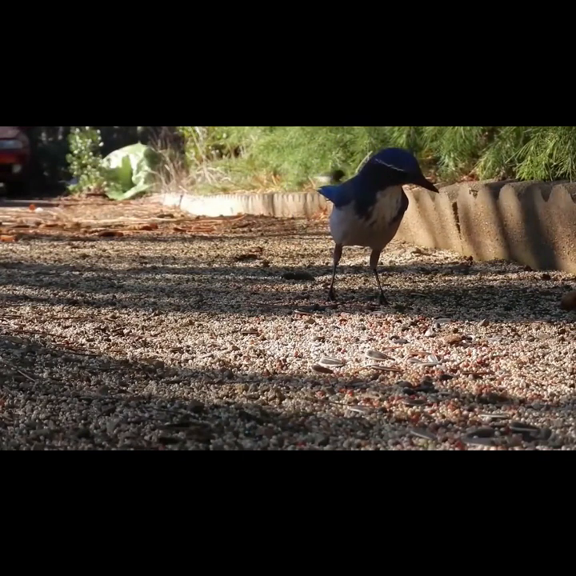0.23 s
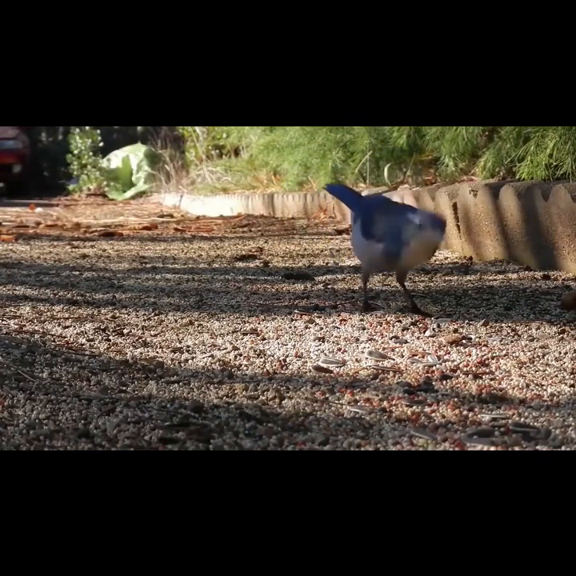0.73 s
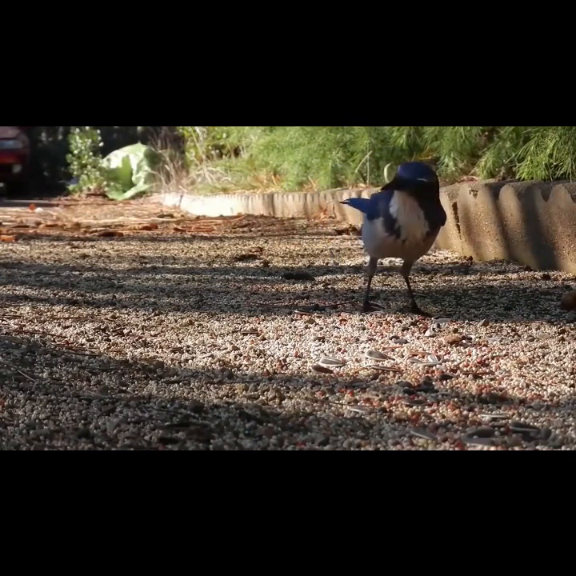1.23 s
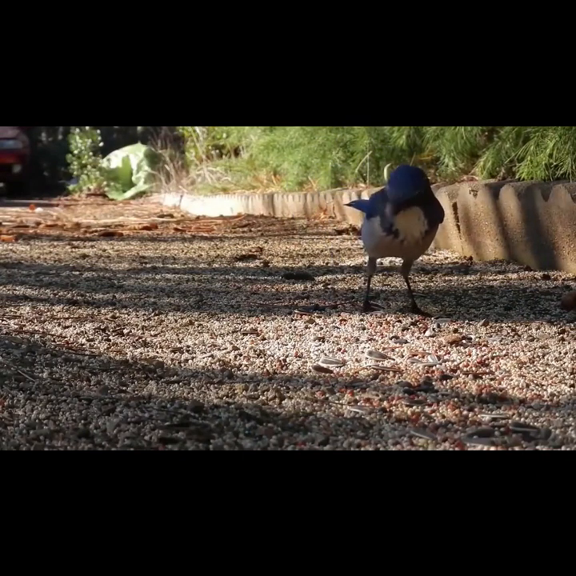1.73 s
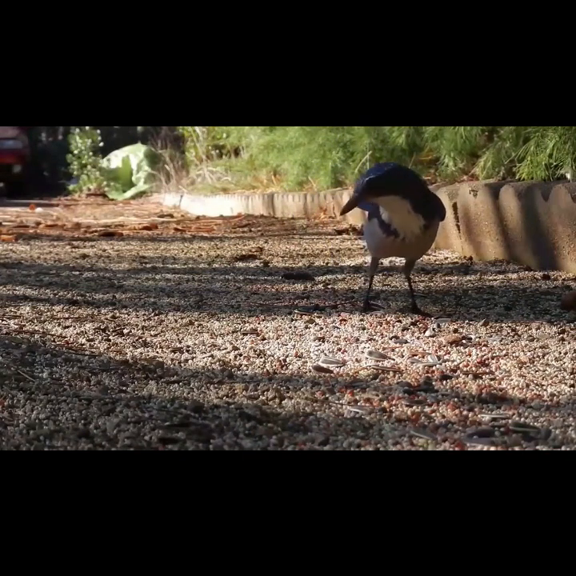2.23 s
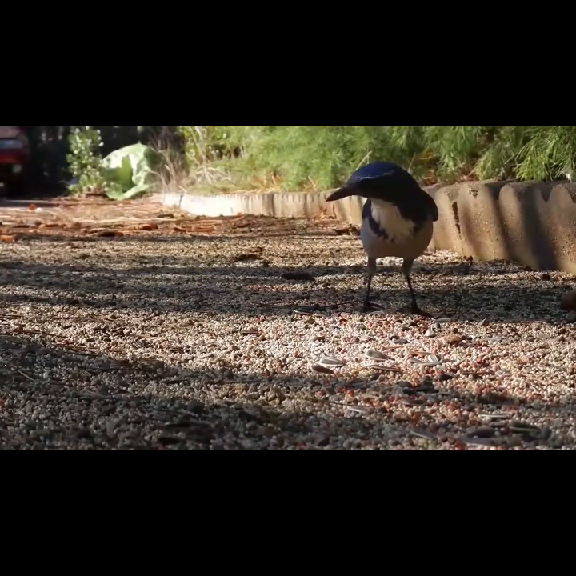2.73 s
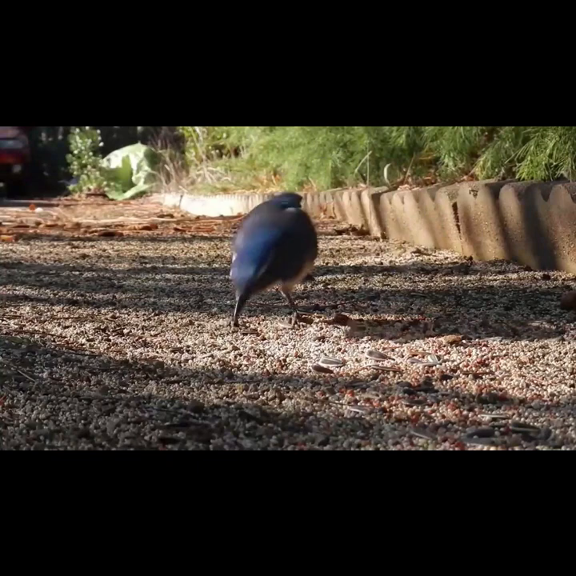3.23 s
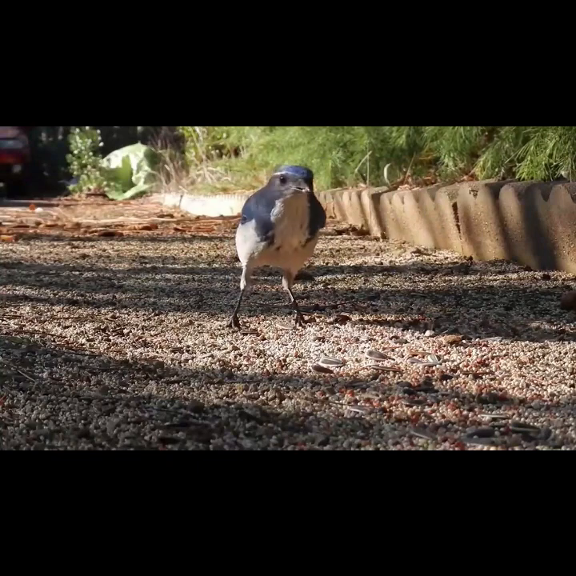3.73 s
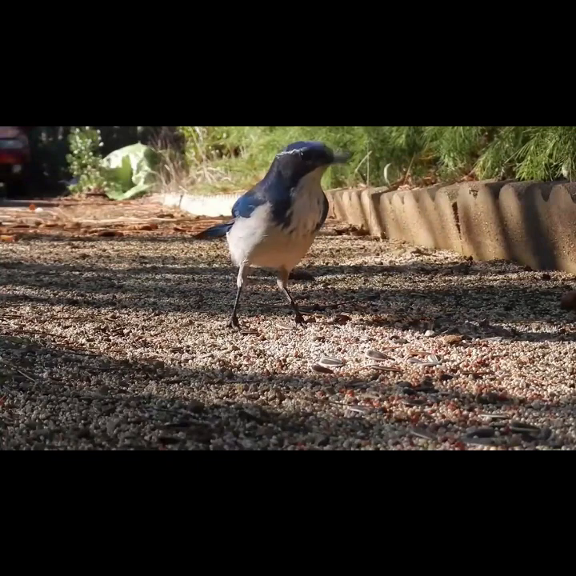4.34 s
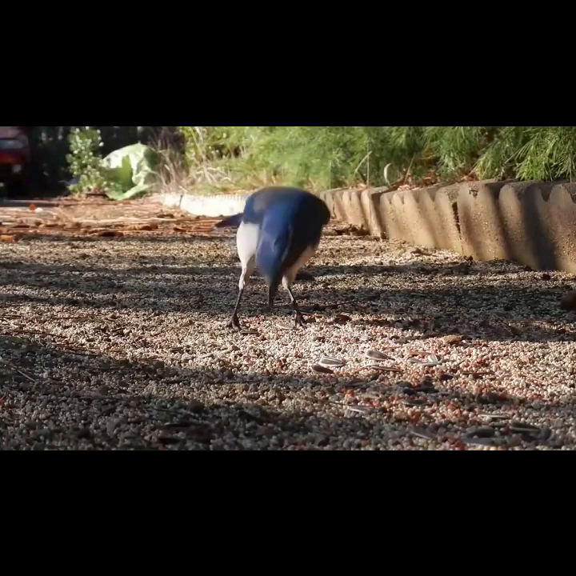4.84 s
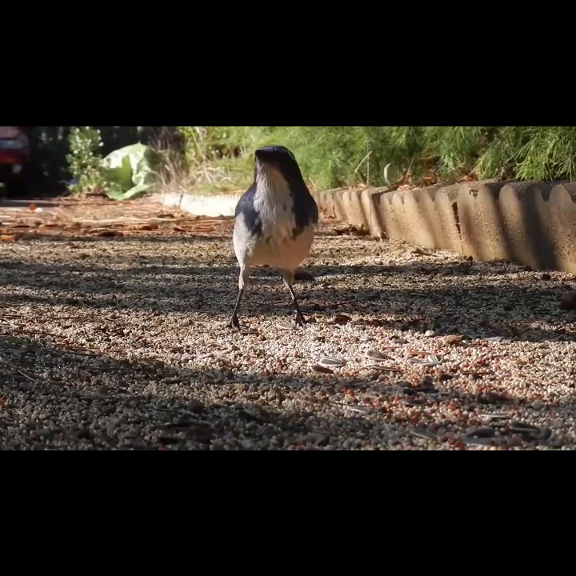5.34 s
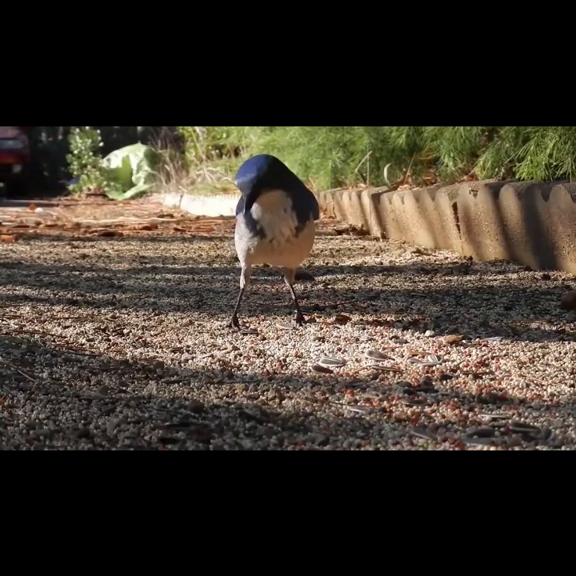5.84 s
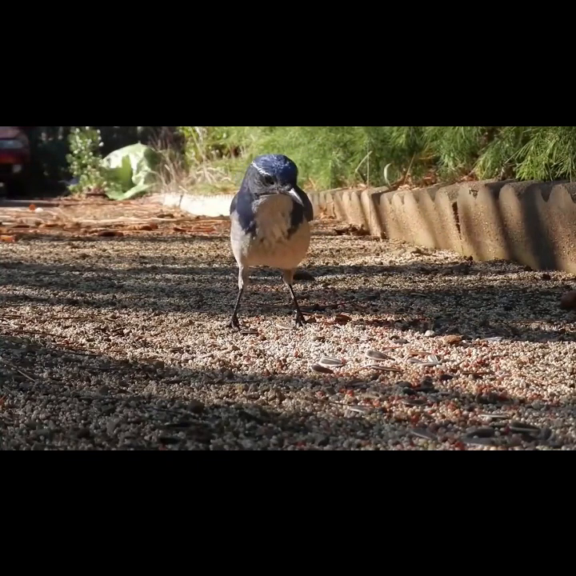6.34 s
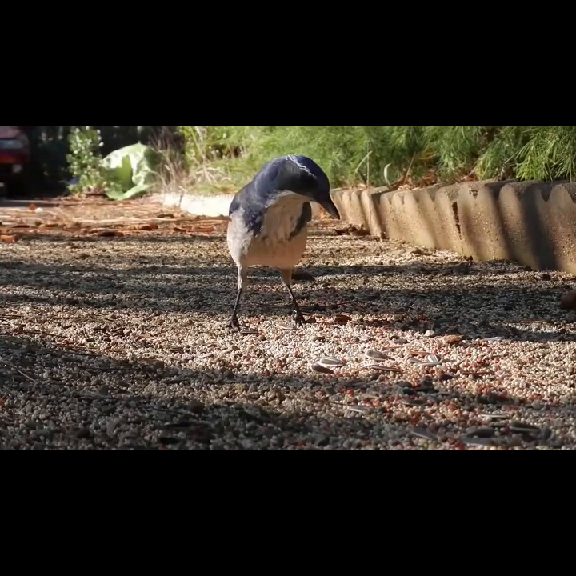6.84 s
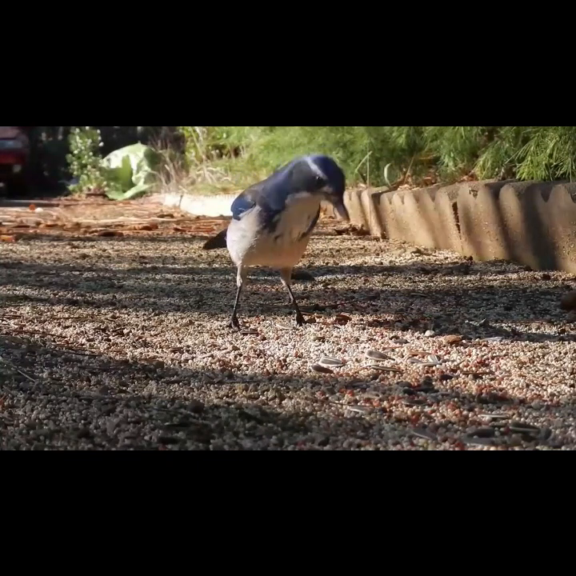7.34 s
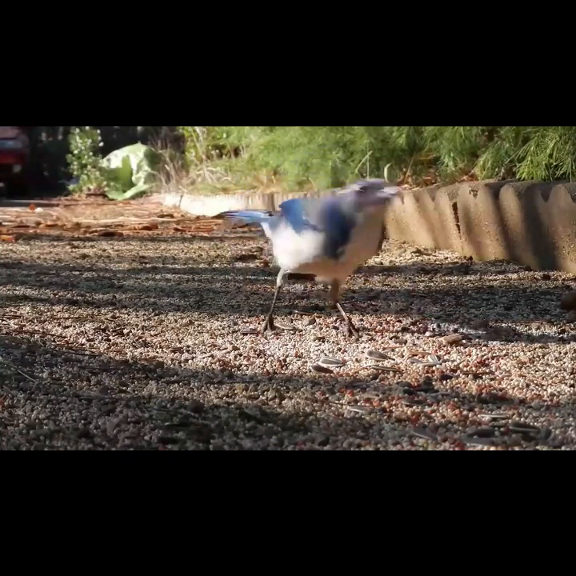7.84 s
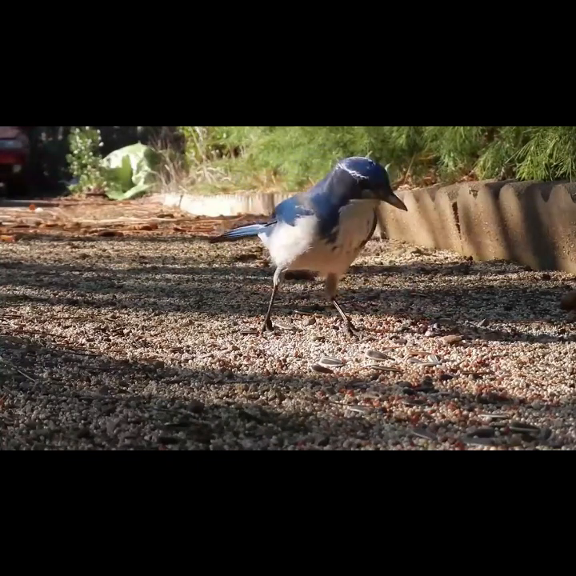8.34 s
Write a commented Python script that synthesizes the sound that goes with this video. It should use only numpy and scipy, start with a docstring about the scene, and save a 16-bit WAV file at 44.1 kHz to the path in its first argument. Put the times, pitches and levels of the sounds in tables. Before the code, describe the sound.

A jay on a gravel path gives short harsh rasping calls in bursts, with softer chirps, rustling gravel, clicks and faint camera ticking between.

```python
"""Jay calls on a gravel path

A jay gives harsh calls close to a camera: two whistled voices beat, part and break into a noisy rasp.
A second bird chirps arched notes made of smooth sine tones; a small far one twitters in thin, breathy whistles.
Noise grains rustle like feathers and gravel, grit clicks, and the focus motor ticks with short ringing tones.
Shaped noise makes the quiet garden air. The recorder cuts the bass and clips peaks that are too loud."""
import sys
import numpy as np
from scipy import signal
from scipy.fft import rfft, irfft, next_fast_len
from scipy.io import wavfile
from scipy.ndimage import uniform_filter1d

SR = 44100
rng = np.random.default_rng(int(sys.argv[2]) if len(sys.argv) > 2 else 0)


def generate_wav(sig):
    """Save sig (samples, or channels by samples) to the path in sys.argv[1] as 16-bit PCM at SR."""
    pcm = np.round(np.clip(np.atleast_2d(sig).T, -1, 1) * 32767).astype(np.int16)
    wavfile.write(sys.argv[1], SR, pcm)


N = 378819  # length in samples

# All levels are settings ahead of each source's own trims, the garden and the recorder.
# The jay's short calls, timed from the catch, where the pitch dips and the voices part:
# (catch [s], rise [s], parting [s], whistle [dB], lower voice [dB], lead-in [dB], parted upper voice [dB],
#  parted lower voice [dB], streak [dB], rebound [dB], pitch [Hz], first beat [Hz], last beat [Hz],
#  upper top [Hz], rasp length [s], rasp [dB], fade [dB], low throat [dB], middle throat [dB], top [dB],
#  beak resonance [Hz])
SHORT_CALLS = [(.02, .043, 0.032, -18.5, -0.5, .1, -10.5, -11, -24.5, -38, 2800, 248, 295, 3560, 0.082, -17.5, 0, -12.5, -2, -11, 6720),
               (.32, 0.048, 0.051, -16, -7, -3.5, -8.5, -9, -28, -42, 2760, 260, 232, 3640, 0.09, -17, -0.5, -11.5, 1.1, -7, 6950),
               (.614, 0.046, 0.038, -16, -5.5, -4, -2, -4, -24, -43, 2760, 175.6, 230, 3707, .076, -16, -3.5, -14.5, -0.5, -7.5, 6920),
               (3.126, .043, .04, -7.5, -2, 4, -0.5, 3.5, -38, -12, 2840, 150.1, 90.8, 3617, .1, -18, 1.5, 1.2, -1.7, -0.2, 7340),
               (3.39, 0.042, 0.042, -8, 2, 4.5, -2.5, 3.5, -30, -26, 2860, 120.5, 139, 3623, 0.091, -18.5, 0, -2, -0.5, 2, 6560),
               (5.326, 0.042, 0.046, -8, -2, -7, 1, 2, -31, -28, 2808, 128.8, 191.7, 3643, 0.1, -20.5, -3.5, 1.5, 3.5, -3, 6970),
               (5.594, 0.048, 0.04, -9, 3.5, -1.5, -1.5, -2.5, -31, -26, 2867, 249.3, 311.7, 3707, 0.09, -19, -1.8, -2, 0.5, 1.4, 6870),
               (5.869, 0.045, .045, -7.5, 1.4, -4, -3, -3.5, -34, -30, 2706, 171.5, 347, 3440, 0.086, -24.5, -0.5, -1, 1.5, 2, 7100),
               (6.15, .036, 0.04, -8, 2, 1, 1, -0.3, -28, -30, 2872, 131, 290.3, 3530, 0.092, -20.5, 0.4, 1, 1, 1.5, 7040),
               (6.535, 0.041, 0.044, -7.5, -1, -3, 0.6, 0.3, -31, -28, 2798, 119.7, 99.7, 3530, 0.097, -22.5, 2.5, 0.5, 0, -5, 6900),
               (6.815, .043, 0.045, -8.5, 2, 0.5, 2, -4.5, -32, -27, 2765, 400.6, 212.7, 3570, .1, -21.5, -6, 0, 2, -2.5, 6760)]
# Whistle of a short call; place counts in rises before the catch, in partings after it:
# (place [-], lower voice share of pitch [-], lower voice level [dB], climb of upper voice [0-1],
#  upper voice level [dB])
SHORT_WHISTLE = [(-2.05, .52, -46, .05, -43), (-1.57, .62, -27, .2, -23.5), (-1.2, .8, -23, .3, -23.5),
                 (-1.02, .88, -9.5, .02, -3.5), (-.52, 0.96, -4, .02, -3), (-.2, 0.98, -3, .02, -1),
                 (-.1, .97, -8, 0, -5.5), (.001, .93, 3.5, .02, -9), (.12, .94, -11, .1, -2),
                 (.24, .955, -14, .35, 3), (.38, .95, -9.5, .7, -14), (.53, .94, -9, 1, -5.5),
                 (.75, .83, -13, 0.9, -21.5), (1.02, .69, -12, 1, -15), (1.35, 0.496, -15.5, .8, -42)]
# Three fainter strands of a short call: one climbs from below into the catch, one falls from above after it,
# one arches up from the lowest point: (place [-], share of pitch [-], level [dB], overtone level [dB])
UNDER_STRAND = [(-0.8, 0.59, -21.5, -19.5), (-.3, .55, -20, -11), (-0.3, .75, -13.5, -20),
                (0.2, 0.84, -22, -18)]
STREAK_STRAND = [(-.1, 1.9, -3, -28), (.35, 1.9, -3.3, -26), (.8, 1.7, 3, -27), (1.15, 1.2, 4, -29)]
REBOUND_STRAND = [(.98, 0.74, -4.5, -25), (1.35, 1, .1, -25), (1.55, .9, -4.5, -26), (1.85, .68, -7, -25)]
# The jay's long calls: (catch [s], whistle [dB], pitch factor [-], rise [s], rasp length [s], rasp [dB],
#  fade [dB], low throat [dB], middle throat [dB], top [dB], beak resonance [Hz])
LONG_CALLS = [(8.372, -0.06, .999, .06, .078, -22.5, 1.5, 4, 1.5, 4, 7030),
              (8.628, -0.4, 1.01, 0.061, .078, -18.5, .1, 0.5, 3, 5, 7060)]
# Whistle of a long call, which climbs further and tumbles twice:
# (time from the catch [s], lower voice [Hz], its level [dB], upper voice [Hz], its level [dB])
LONG_CALL_WHISTLE = [(-.097, 1602, -54, 1900, -39), (-.078, 1848, -17.5, 2700, -24.5),
                     (-.068, 2335, -20, 2450, -13), (-.058, 2606, -12, 2740, -5),
                     (-.039, 2976, -9, 3388, -16), (-.024, 3040, -13, 3300, -25),
                     (-.008, 3000, -29, 3384, -11.5), (.001, 2875, -6, 3420, -13),
                     (0.013, 2825, -10.5, 3740, -9), (.026, 2249, -15, 2800, -9.5),
                     (.036, 1885, -18, 3290, -12), (.046, 1860, -25, 2950, -8.5),
                     (.058, 1780, -20, 2050, -23)]
# Rasp of every call; place counts in rises before the catch, in rasp lengths after it:
# (place [-], effort [dB], low throat [dB], middle throat [dB], top [dB], share of beak resonance [-])
RASP_SHAPE = [(-2, -36.5, 4.5, 8, -4, 0.94), (-1.3073, -16.5, 7, 1, -2, 1),
              (-0.61, 1.27, -6.5, -6.5, -2, 1), (0.3436, -2, 0.5, -4, 1.5, 0.92),
              (0.6432, -1.5, 3, 4, 0, 0.93), (1.07, -5, 1.5, 3, -3, 0.97), (1.1258, -16.5, 3, 6, -0.5, .93),
              (1.83, -36, -17, 10, -3, .94)]
# Throat resonances from low to top: (frequency [Hz], width [Hz], level [dB])
LOW_MODES = [(1957, 856, 1.5), (2556, 430, 0.5), (3006, 430, 3), (3530, 600, -0.5)]
MID_MODES = [(4525, 1100, -5.5), (4910, 680, -5)]
HIGH_MODES = [(5620, 1450, -6), (6117, 800, -3)]
TOP_MODES = [(7640, 1770, -0.5), (11100, 3650, -1.5), (13960, 2660, -3.5)]
# Arched notes of the second bird, each after a hoarse lead-in: (time [s], length [s], top [Hz],
#  landing [Hz], level [dB], lead-in length [s], lead-in level [dB])
ARCHED_NOTES = [(1.327, 0.067, 3456, 1470, -25, 0.029, -31.5),
                (1.847, .065, 3530, 2130, -25.5, 0.028, -34.5), (2.09, 0.054, 2786, 1664, -26, .04, -38)]
# Its first chirp leaps up, sung on both sides of the voice box (syrinx), one table a side:
# (time [s], pitch [Hz], level [dB], overtone level [dB])
LEAPING_CHIRP = [
    [(.953, 1886, -22, -8), (.962, 2050, -37.5, -6), (.978, 1926, -23, -15), (.985, 3500, -16, -29),
     (.991, 4660, -52, -14), (1.005, 5070, -30, -17), (1.032, 4570, -45, -18), (1.045, 4650, -51, -14)],
    [(.986, 4330, -34, -11), (.995, 5620, -33.5, -13), (1.015, 5410, -39, -8), (1.03, 5200, -42, -5)],
]
# Thin notes of a small far bird: (time [s], length [s], centre [Hz], peak level [dB])
THIN_NOTES = [(2.303, 0.096, 8270, -47), (2.395, 0.073, 7950, -48), (2.515, 0.098, 8200, -48)]
# Feathers and gravel stirred: (time [s], swell [s], hold [s], fade [s], level [dB], low part's level [dB])
STIRRINGS = [(2.598, 0.12, .18, 0.047, -43.5, 4.5), (2.798, 0.13, .02, .12, -36, -7),
             (2.973, 0.084, .01, .02, -45, 17), (3.21, 0.022, 0.36, .35, -44, 2.5),
             (7.071, 0.087, 0.031, .1, -35, -16), (7.393, .07, .02, .08, -44.5, -12),
             (7.575, 0.023, 0.012, 0.11, -48.5, -14)]
# Tone colour of the rustles: (frequency [Hz], relative level [dB])
STIRRING_COLOUR = [(3000, -17.5), (4000, 0), (7000, 0), (8800, -6.5), (10500, 3.5), (13500, -1.5),
                   (16000, -7.5)]
# Grit under beak and feet: (time [s], peak level [dB], centre [Hz], left minus right [dB])
GRIT_CLICKS = [(1.265, -32, 2050, 2), (2.0096, -35.5, 2160, 1.5), (2.695, -29, 2060, 2),
               (3.2837, -9, 11300, 4), (7.129, -24, 10300, 5), (7.162, -22.5, 10300, -2),
               (7.9407, -32, 2030, -1.0), (7.9824, -26.5, 2440, -1.0), (8.108, -22, 11400, -3)]
# Tone colour of the garden air: (frequency [Hz], relative level [dB])
AIR_COLOUR = [(600, -46), (800, -17), (1000, -25), (1400, -19.5), (1650, -6), (2200, -8), (2700, -9),
              (4000, -12.5), (5000, -15), (9200, -20), (10800, -17), (14000, -21.5), (14700, -31)]
# How alike the air is at left and right: (frequency [Hz], likeness [0-1])
AIR_LIKENESS = [(1400, 0.69), (3100, 0.22), (6800, 0.0162)]
# Steady tone of the camera electronics: (frequency [Hz], level [dB])
CAMERA_WHINE = [(14836, -52.5)]
# Sound scattered by gravel and camera body: (frequency [Hz], level [dB])
SCATTER_COLOUR = [(1500, -4), (2800, -12), (4400, -6), (8000, 7), (14000, -3.5)]
# Uneven hearing of the two microphone ports: (frequency [Hz], left minus right [dB])
PORT_BIAS = [(1300, 1.5), (2400, 1), (4400, 3), (8100, -4.5), (15000, 1)]

FOOT_HZ, ARCH_SKEW, ARCH_ROUND = 1970, .9, .75
LEAD_SWELL_DB, NOTE_FADE_DB, LEAD_OVERTONE_DB, NOTE_OVERTONE_DB = -11, -9, -8.5, -25.5
TWITTER_PEAK, TWITTER_IN_DB, TWITTER_OUT_DB, TWITTER_SAG = .33, -18, -17, 0.92  # peak as a share of length
RUSTLE_EDGE_DB = -19.5
# the focus motor steps evenly, twice as often for a short spell
STEPS_FROM_S, STEPS_TO_S, STEP_S, HURRY_FROM_S, HURRY_TO_S = 3.5825, 5.2, .06675, 4.46, 4.64
STEP_DB, STEP_SPREAD_DB, JOLT_DB, JOLT_S = -42, 1.5, 6, .12
AIR_DB = -47.5
BASS_CUT_HZ, EDGE_HZ = 1450, 15600


def jay(catch, rise, parting, db, lower_db, lead_db, up_db, down_db, streak_db, rebound_db, hz,
        first_hz, last_hz, top_hz, *rasped):
    """One short call: the shared whistle and strands, stretched and pitched by its row, over the rasp."""
    def timed(place):
        """Turns places in the call into seconds."""
        return catch + place * np.where(place < 0, rise, parting)

    place, share, a_db, climb, b_db = np.transpose(SHORT_WHISTLE)
    climb = np.clip(climb, 0, 1)
    parted = np.clip(place / 0.68, 0, 1)
    both_db = db + lead_db * (place < -1.1)
    # the gap between the voices is the beat rate until the upper one climbs away
    beat_hz = np.interp(place, [-1.0, -.2], [first_hz, last_hz])
    lower_hz = share * hz
    upper_hz = (1 - climb) * (lower_hz + beat_hz) + climb * top_hz
    low_level_db = both_db + lower_db + down_db * parted + a_db
    high_level_db = both_db + up_db * parted + b_db
    yield voices(np.transpose([timed(place), lower_hz, low_level_db, upper_hz, high_level_db]))
    faint = ((UNDER_STRAND, db + lower_db), (STREAK_STRAND, streak_db), (REBOUND_STRAND, rebound_db))
    for strand, level_db in faint:
        place, share, shape_db, overtone_db = np.transpose(strand)
        yield chirp(np.transpose([timed(place), share * hz, level_db + shape_db, overtone_db]))
    yield rasping(catch, rise, *rasped)


def long_jay(catch, db, factor, *rasped):
    """One long call: its two-voiced whistle, scaled in pitch and level, over the rasp."""
    yield voices(np.array(LONG_CALL_WHISTLE) * [1, factor, 1, factor, 1] + [catch, 0, db, 0, db])
    yield rasping(catch, *rasped)


def voices(rows):
    """Two membranes at once: close pitches beat, extra tones mix the two, and both roughen as they part."""
    s, (low_hz, low_db, high_hz, high_db) = unrolled(rows)
    parted = np.clip((high_hz - low_hz - 300.) / 550.0, 0, 1)
    low = swing(low_hz, 24.4 + 41.6 * parted)
    high = swing(high_hz, 26.3 + 136.6 * parted)
    rough_db = 1.5 + 3.14 * parted
    a = gain_of(low_db + 1.5 + rough_db * wobble(len(low_db), 180))
    b = gain_of(high_db + 1.5 + rough_db * wobble(len(high_db), 180))
    both = np.sqrt(a * b)
    sidebands = gain_of(-38.0) * np.sin(2 * low - high) + gain_of(-17.5) * np.sin(2 * high - low)
    octaves = gain_of(-28.5) * (a * np.sin(2 * low) + b * np.sin(2 * high))
    sum_tone = gain_of(-37.5) * both * np.sin(low + high)
    sound = a * np.sin(low) + b * np.sin(high) + both * sidebands + octaves + sum_tone
    # soft ends, but none for a call already under way at time zero
    return s, np.sqrt(2) * sound * signal.windows.tukey(len(a), 0.062 * (s > 0))


def swing(hz, waver_hz):
    """Phase of a membrane whose pitch wavers quickly."""
    return 2 * np.pi * (np.cumsum(hz + waver_hz * wobble(len(hz), 470)) / SR + rng.random())


def rasping(catch, rise, length, db, fade_db, low_db, mid_db, top_db, beak_hz):
    """The shared rasp, stretched and coloured for one call."""
    place, effort_db, *colours_db, share = np.transpose(RASP_SHAPE)
    s = catch + place * np.where(place < 0, rise, length)
    effort_db = db + effort_db + fade_db * np.clip(place, 0, 1)
    colours_db = colours_db + np.c_[[low_db, mid_db, top_db]]
    return rasp(np.transpose([s, effort_db, *colours_db, share * beak_hz]))


def rasp(rows):
    """Broken tones, irregular slaps and rough air ring the throat; one resonance moves with the beak."""
    s, (effort_db, low_db, mid_db, top_db, beak_hz) = unrolled(rows)
    count = len(beak_hz)
    slaps = (rng.random(count) < 900 / SR) * rng.standard_normal(count)  # about 900 a second
    drive = 0.6 * evened(slaps) + 0.78 * rng.standard_normal(count) + 0.65 * strands(count)
    beak = evened(resonate(drive, beak_hz, 1100.))
    high = evened(throat(drive, HIGH_MODES) + gain_of(-2.) * beak)
    low = gain_of(low_db + 7.0) * throat(drive, LOW_MODES)
    middle = gain_of(mid_db - 1.0) * throat(drive, MID_MODES)
    top = gain_of(top_db - 1.26) * throat(drive, TOP_MODES)
    sound = gain_of(effort_db - 3.5) * (high + low + middle + top)
    return s, sound * signal.windows.tukey(count, 0.013 * (s > 0))


def strands(count):
    """Chaotic membranes: many tones that glide up, then down, each swelling and fading unevenly."""
    arch = np.sin(np.pi * np.linspace(0, 1, count))
    out = np.zeros(count)
    for hz in np.geomspace(1600., 6000., num=18):
        glide_hz = hz * (.5 + .7 * arch + .09 * wobble(count, 60))
        out += gain_of(5.8 * wobble(count, 88)) * np.sin(swing(glide_hz, 25.4))
    return evened(out)


def throat(x, modes):
    """A throat as a sum of fixed resonances of alternating sign."""
    return evened(sum((-1) ** k * gain_of(db) * resonate(x, hz, width)
                      for k, (hz, width, db) in enumerate(modes)))


def arched(s, length, top_hz, landing_hz, db, lead, lead_db):
    """The second bird: a low hoarse swell, then a note that arches up and fades as it lands."""
    yield chirp([(s - lead, FOOT_HZ, lead_db + LEAD_SWELL_DB, LEAD_OVERTONE_DB),
                 (s, FOOT_HZ, lead_db, LEAD_OVERTONE_DB)])
    u = np.linspace(0, 1, num=25)
    base_hz = FOOT_HZ + (landing_hz - FOOT_HZ) * u
    arch = abs(np.sin(np.pi * u ** ARCH_SKEW)) ** ARCH_ROUND
    hz = base_hz + (top_hz - base_hz) * arch
    yield chirp(np.transpose([s + length * u, hz, db + NOTE_FADE_DB * u ** 4, NOTE_OVERTONE_DB + 0 * u]))


def chirp(rows):
    """A smooth whistle with a breathy octave; wavering makes it hoarser while it is low."""
    s, (hz, db, overtone_db) = unrolled(rows)
    hz = uniform_filter1d(hz, 180, mode="nearest")
    hoarse = 0.58 + np.clip((2150. - hz) / 390.0, 0, 1)
    turns = swing(hz, 91.0 * hoarse)
    octave = gain_of(overtone_db) * wobble(len(hz), 1500) * np.sin(2 * turns)
    level = gain_of(db + 3.7 * hoarse * wobble(len(hz), 440))
    return s, np.sqrt(2) * level * (np.sin(turns) + octave) * signal.windows.tukey(len(hz), .15)


def thin_note(s, length, hz, db):
    """The small bird: a note swells to a peak, then fades and sags."""
    yield twitter([(s, hz, db + TWITTER_IN_DB), (s + TWITTER_PEAK * length, hz, db),
                   (s + length, TWITTER_SAG * hz, db + TWITTER_OUT_DB)])


def twitter(rows):
    """A thin wavering whistle that arches up and slides down, half lost in breathy noise."""
    s, (hz, db) = unrolled(rows)
    hz = hz + 660.0 * (np.sin(np.pi * np.linspace(0, 1, len(hz)) ** .7) - .7)
    breath = evened(resonate(rng.standard_normal(len(hz)), hz, 1200.))
    return s, gain_of(db) * (0.61 * np.sin(swing(hz, 194.0)) + 0.87 * breath)


def rustle(rows):
    """Feathers and gravel: clumped noise grains, partly different at each microphone."""
    s, (db, low_db) = unrolled(rows)
    count = len(db)
    clumps = gain_of(2.4 * wobble(count, 270))
    shared, left, right = rng.standard_normal((3, count))
    grains = clumps * (0.64 * shared + np.array([left, right]))
    low = coloured(grains, [(1200, -21.5), (1700, -0.5), (2600, -6.5), (4000, -11.5), (5000, -23)])
    sound = evened(coloured(grains, STIRRING_COLOUR)) + gain_of(low_db) * evened(low)
    return s, gain_of(db) * sound * signal.windows.tukey(count, .1)


def click(db, hz, pan_db):
    """A pebble snap: a noise burst that dies off in a few milliseconds, broad around its centre."""
    t = np.arange(400) / SR
    burst = rng.standard_normal(len(t)) * np.exp(-t / 0.0031)
    burst = .5 * burst + resonate(burst, hz, 2100.0)
    return gain_of(db + np.array([[.5], [-.5]]) * pan_db) * burst / abs(burst).max()


def motor_steps():
    """Times and levels of the focus motor's steps; the first ones jolt harder."""
    s = np.arange(STEPS_FROM_S, STEPS_TO_S, STEP_S / 2)
    jolt_db = JOLT_DB * np.exp((STEPS_FROM_S - s) / JOLT_S)
    db = STEP_DB + STEP_SPREAD_DB * rng.standard_normal(len(s)) + jolt_db
    # every other step, or all of them in the hurried spell
    heard = (np.arange(len(s)) % 2 == 0) | ((s > HURRY_FROM_S) & (s < HURRY_TO_S))
    return zip(s[heard], db[heard])


def tick(db):
    """A soft motor step rings the camera shell at two pitches."""
    t = np.arange(700) / SR
    ring = np.sin(2 * np.pi * 1680 * t) + .4 * np.sin(2 * np.pi * 2050 * t)
    return gain_of(db) * ring * (t / .0025) * np.exp(1 - t / .0025)


def air():
    """Distant leaves and town: random short-time spectra with faint patches, plus the camera whine."""
    frames, hz = N // 128 + 5, np.fft.rfftfreq(512, 1 / SR)
    a, b, c, d, patches = rng.standard_normal((frames, 257, 5)).T
    patches = evened(uniform_filter1d(uniform_filter1d(patches, 8, 0), 24, 1))
    same = np.clip(read(AIR_LIKENESS, hz), -1, 1)[:, None]
    left = a + 1j * b
    right = same * left + np.sqrt(1 - same ** 2) * (c + 1j * d)
    spectra = np.array([left, right]) * gain_of(read(AIR_COLOUR, hz)[:, None] + 1.6 * patches)
    hush = gain_of(AIR_DB) * evened(signal.istft(spectra, nperseg=512, noverlap=384)[1][:, :N])
    t = np.arange(N) / SR
    return hush + sum(np.sqrt(2) * gain_of(db) * np.sin(2 * np.pi * tone_hz * t)
                      for tone_hz, db in CAMERA_WHINE)


def scattered(x):
    """Direct sound plus scatter within some milliseconds, new for each sound as the bird shifts."""
    t = np.arange(3000) / SR
    near = rng.standard_normal((2, len(t))) * gain_of(-60 * t / 0.061) * (t > .0003)
    near /= np.linalg.norm(near, axis=1, keepdims=True)
    near = coloured(np.pad(near, ((0, 0), (64, 0))), SCATTER_COLOUR)[:, 64:]
    near[0, 1] += 1  # the left port hears the birds one sample later
    near[1, 0] += 1
    return signal.oaconvolve(x[None], near, axes=1)


def garden(x):
    """A faint tail from walls and shrubs, then the uneven ears of the two ports."""
    t = np.arange(SR // 2) / SR
    far = rng.standard_normal((2, len(t))) * gain_of(-60 * t / 0.45) * (t > .005)
    far = coloured(far, [(2000, -2), (5000, 8.5), (9000, -7.5)])  # leaves soak up the treble
    far *= gain_of(-24.0) / np.linalg.norm(far, axis=1, keepdims=True)
    heard = x + signal.oaconvolve(x, far, axes=1)[:, :N]
    return np.array([coloured(ear, [(hz, side * db) for hz, db in PORT_BIAS])
                     for ear, side in zip(heard, (.5, -.5))])


def gain_of(db):
    """Turns decibels into a factor."""
    return 10 ** (np.asarray(db) / 20)


def evened(x):
    """Scales to an average strength (rms) of one."""
    return x / np.sqrt(np.mean(x ** 2) + 1e-20)


def read(points, hz):
    """Reads a spectrum table on a log-frequency axis."""
    f, value = np.transpose(points)
    return np.interp(np.log(hz + 1), np.log(f + 1), value)


def coloured(x, points):
    """Filters along the last axis by a table of (frequency [Hz], level [dB])."""
    size = next_fast_len(x.shape[-1])
    gains = gain_of(read(points, np.fft.rfftfreq(size, 1 / SR)))
    return irfft(rfft(x, size) * gains, size)[..., :x.shape[-1]]


def resonate(x, hz, width):
    """A steep resonance of gain 1: shifts the pitch curve down to zero, smooths twice, shifts back."""
    turn = np.exp(2j * np.pi * np.cumsum(hz * np.ones(len(x))) / SR)
    r = np.exp(-np.pi * width / SR)
    return 2 * (turn * signal.lfilter([(1 - r) ** 2], [1, -2 * r, r * r], x / turn)).real


def wobble(count, per_s):
    """Smoothed random motion with an rms of one; a higher rate makes it quicker."""
    span = max(int(SR / per_s), 2)
    return evened(uniform_filter1d(uniform_filter1d(rng.standard_normal(count), span), span))


def unrolled(rows):
    """Start time of a table, and each other column drawn out at the sample rate."""
    s, *columns = np.transpose(rows)
    t = np.arange(s[0], s[-1], 1 / SR)
    return s[0], [np.interp(t, s, c) for c in columns]


def add(mix, s, sound):
    """Mixes a sound in at a time in seconds; what falls before zero is not heard."""
    at = round(s * SR)
    sound = sound[..., max(-at, 0):]
    part = mix[..., max(at, 0):][..., :sound.shape[-1]]
    part += sound[..., :part.shape[-1]]


def scene():
    """Birds heard through the garden, then close small sounds and air."""
    birds, close = np.zeros((2, N)), air()
    singers = ((jay, SHORT_CALLS), (long_jay, LONG_CALLS), (arched, ARCHED_NOTES), (thin_note, THIN_NOTES))
    for source, table in singers:
        for row in table:
            for s, sound in source(*row):
                add(birds, s, scattered(sound))
    for rows in LEAPING_CHIRP:
        s, sound = chirp(rows)
        add(birds, s, scattered(sound))
    for s, swell, hold, fade, db, low_db in STIRRINGS:
        corners = s + np.cumsum([0, swell, hold, fade])
        levels_db = db + RUSTLE_EDGE_DB * np.array([1, 0, 0, 1])
        add(close, *rustle(np.transpose([corners, levels_db, [low_db] * 4])))
    for s, *row in GRIT_CLICKS:
        add(close, s, click(*row))
    for s, db in motor_steps():
        add(close, s - .002, tick(db))  # starts early, as a tick takes a moment to swell
    return garden(birds) + close


def record(dry):
    """The recorder: a steep wind filter cuts the bass, peaks clip near full scale, then the top is cut."""
    thin = signal.sosfilt(signal.butter(5, BASS_CUT_HZ, "high", fs=SR, output="sos"), dry)
    clipped = np.clip(thin, -.97, .97)
    band_limit = signal.firwin(511, EDGE_HZ, window=("kaiser", 9), fs=SR)
    return signal.oaconvolve(clipped, band_limit[None], "same")


dry = scene()
out = record(dry)
generate_wav(out)
```